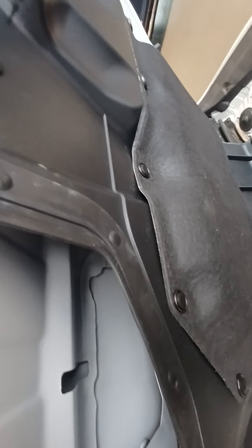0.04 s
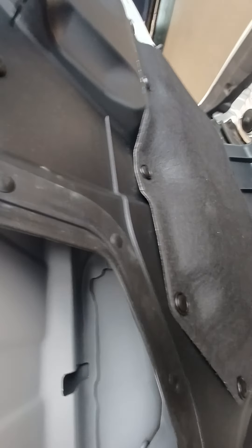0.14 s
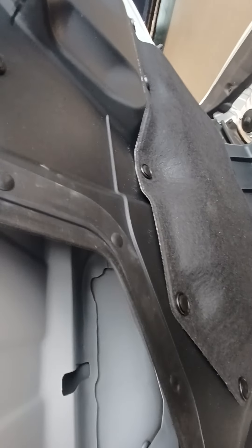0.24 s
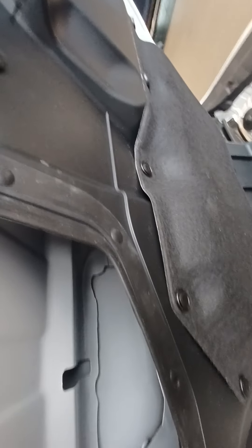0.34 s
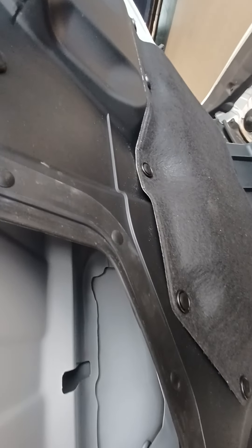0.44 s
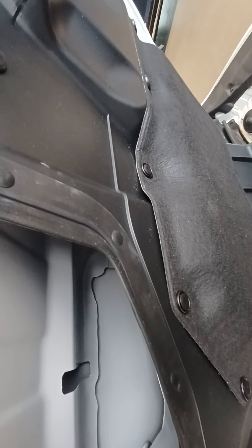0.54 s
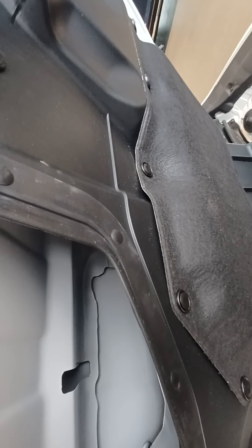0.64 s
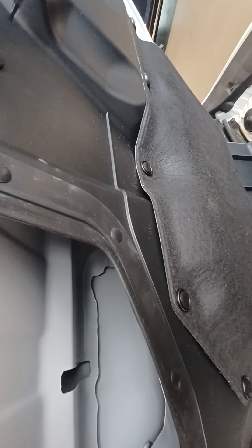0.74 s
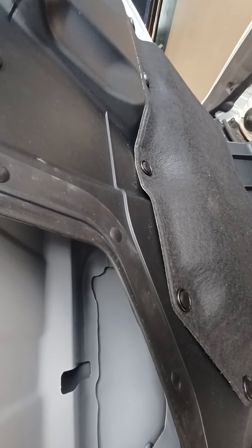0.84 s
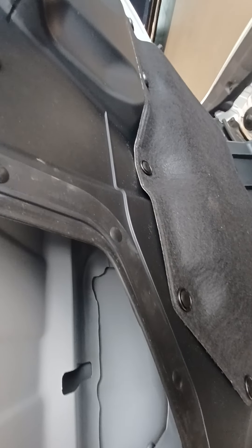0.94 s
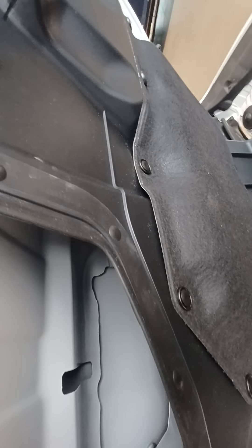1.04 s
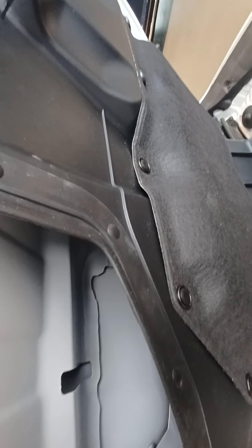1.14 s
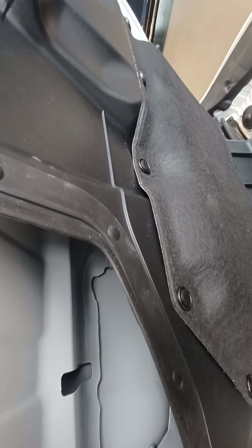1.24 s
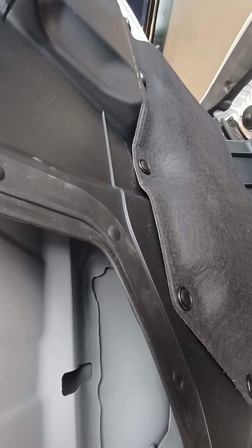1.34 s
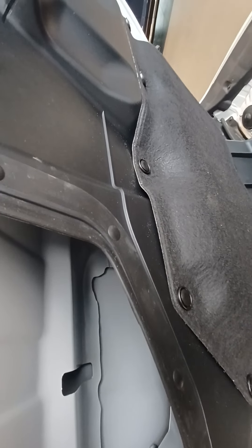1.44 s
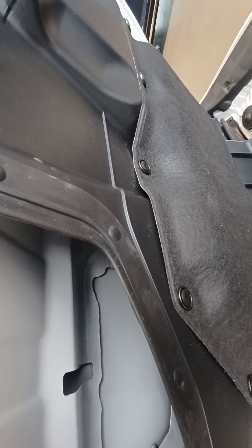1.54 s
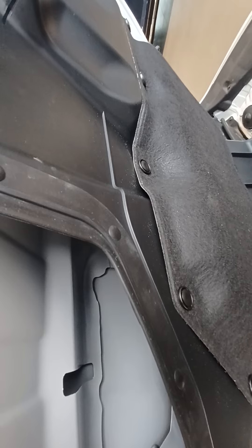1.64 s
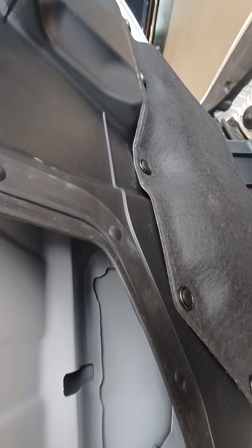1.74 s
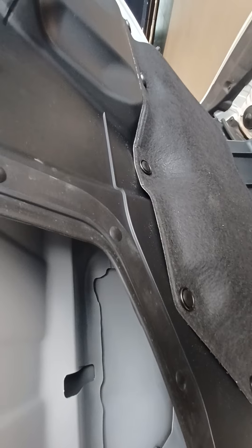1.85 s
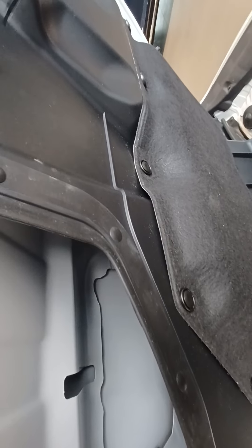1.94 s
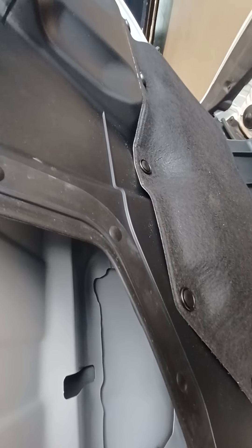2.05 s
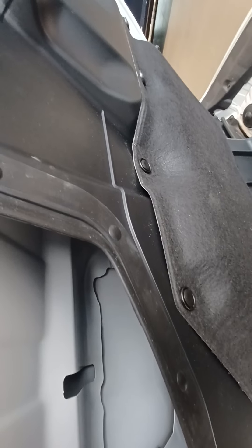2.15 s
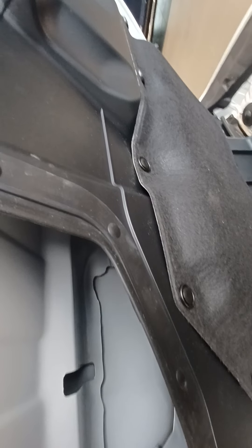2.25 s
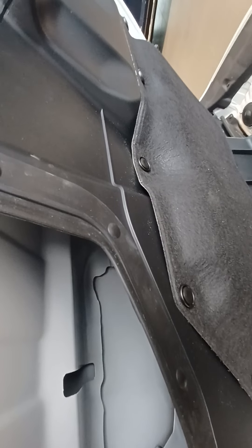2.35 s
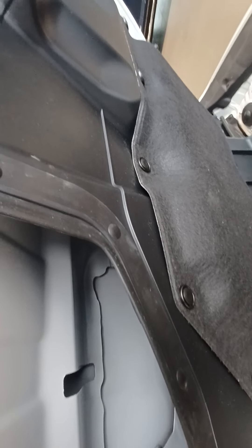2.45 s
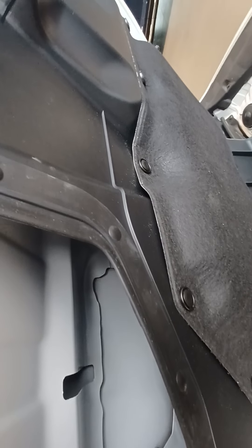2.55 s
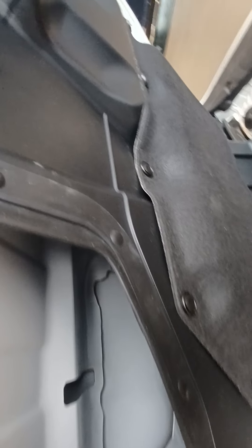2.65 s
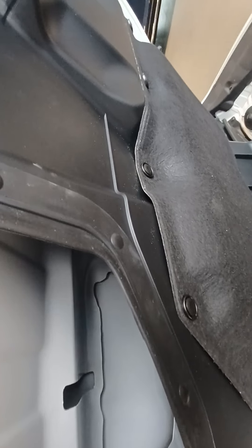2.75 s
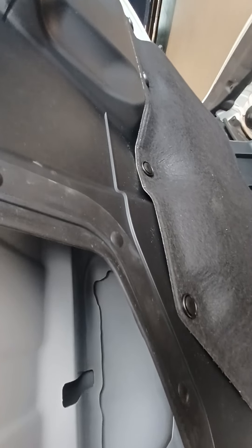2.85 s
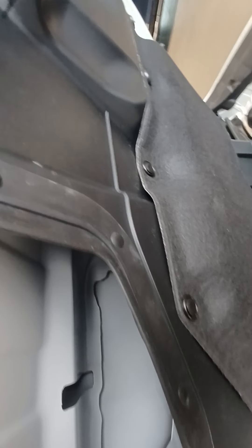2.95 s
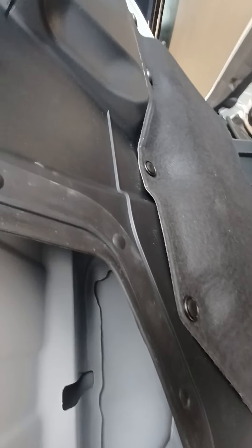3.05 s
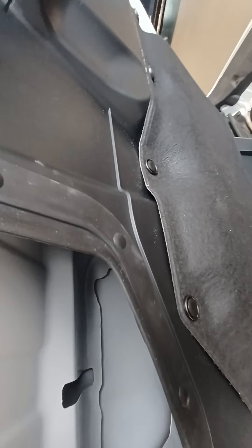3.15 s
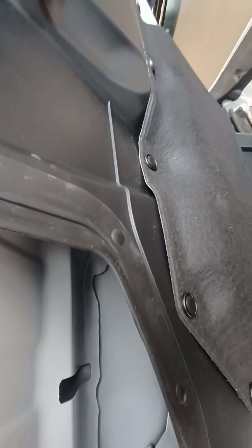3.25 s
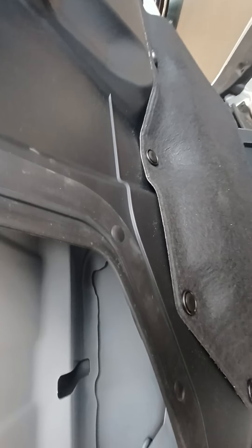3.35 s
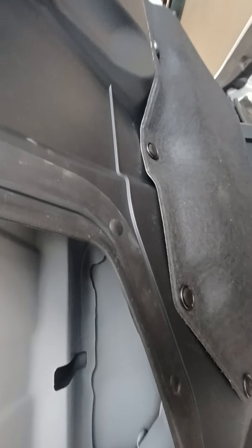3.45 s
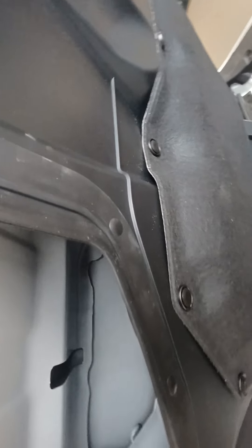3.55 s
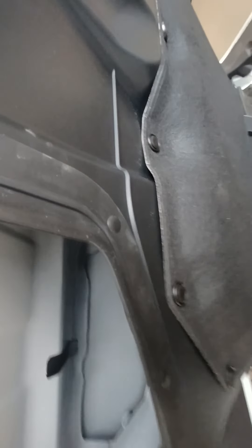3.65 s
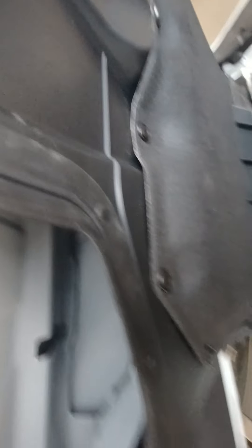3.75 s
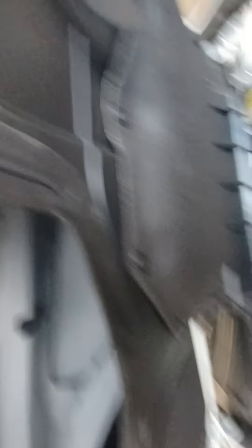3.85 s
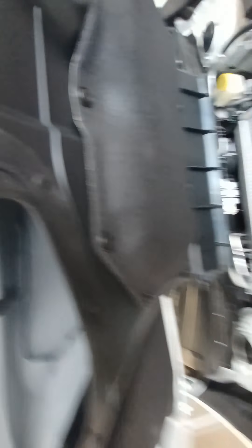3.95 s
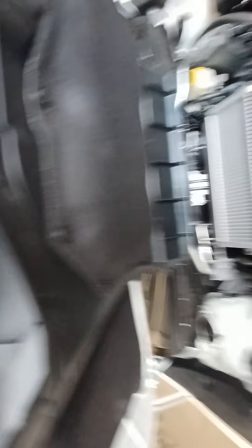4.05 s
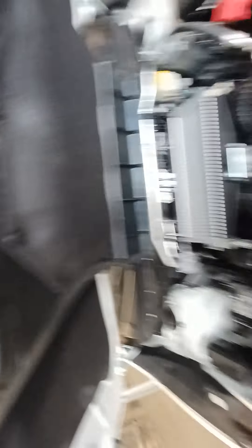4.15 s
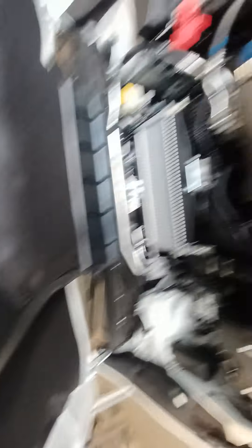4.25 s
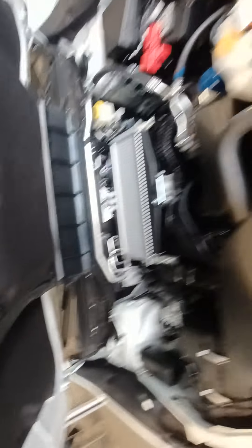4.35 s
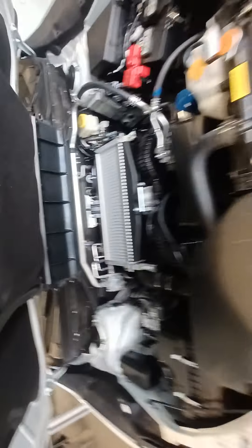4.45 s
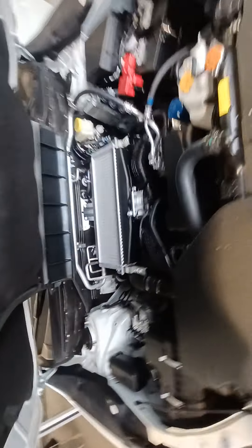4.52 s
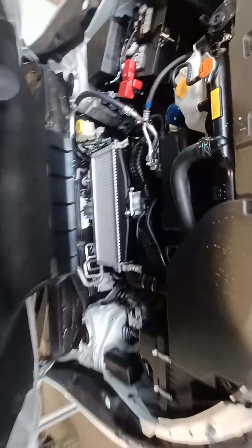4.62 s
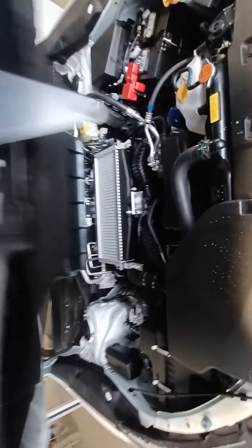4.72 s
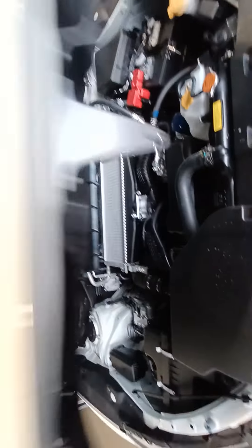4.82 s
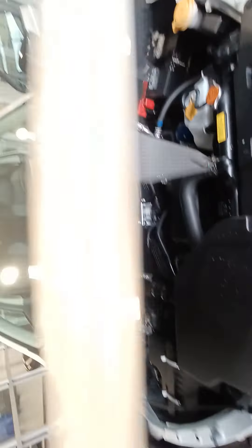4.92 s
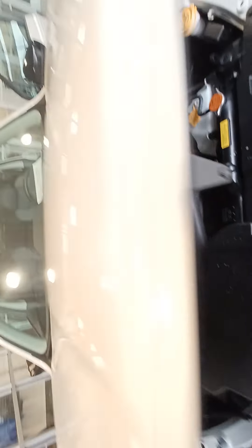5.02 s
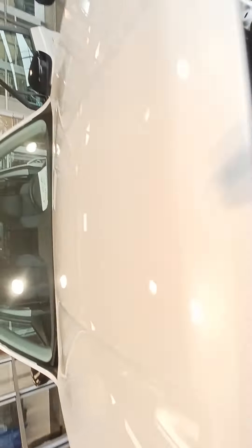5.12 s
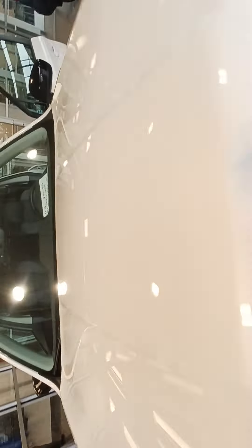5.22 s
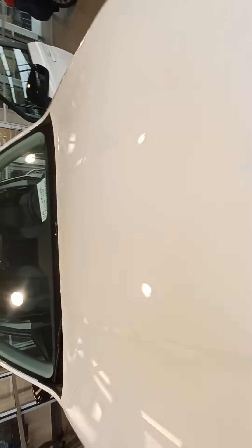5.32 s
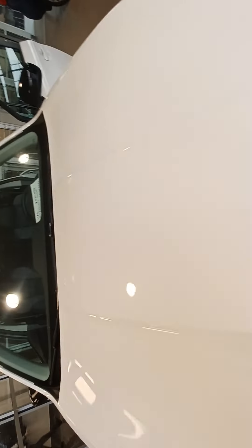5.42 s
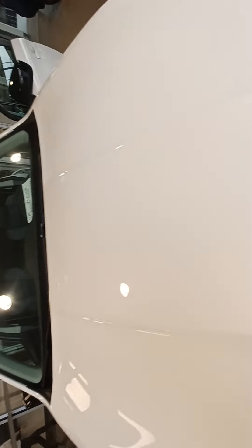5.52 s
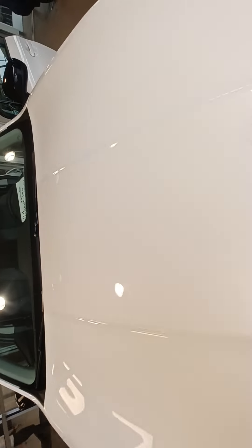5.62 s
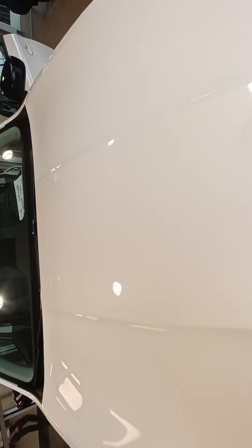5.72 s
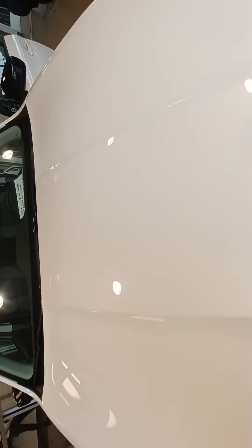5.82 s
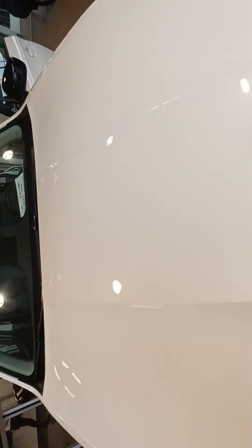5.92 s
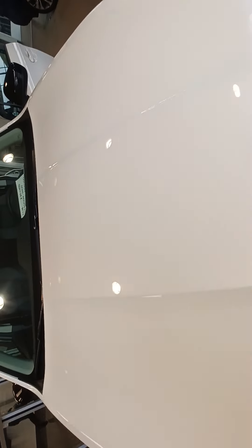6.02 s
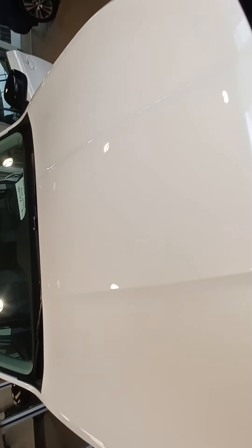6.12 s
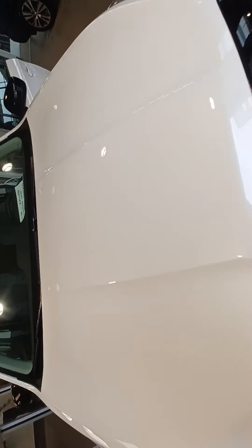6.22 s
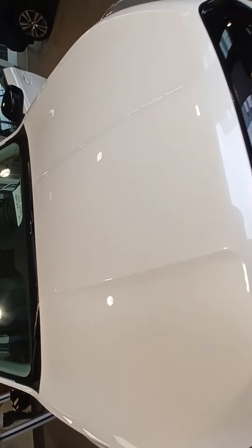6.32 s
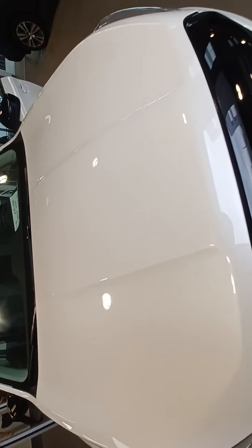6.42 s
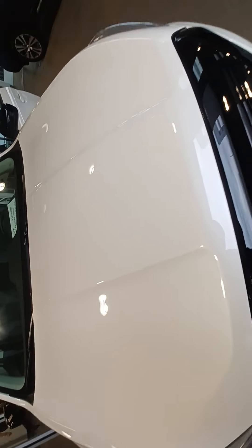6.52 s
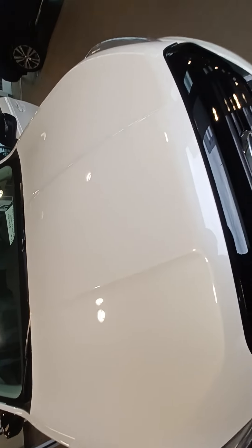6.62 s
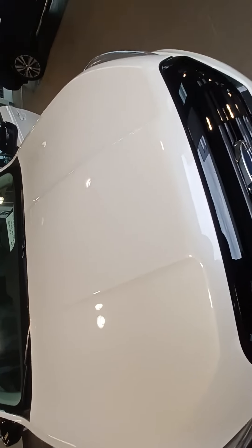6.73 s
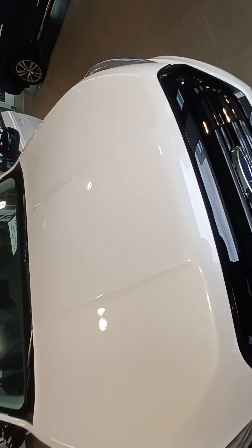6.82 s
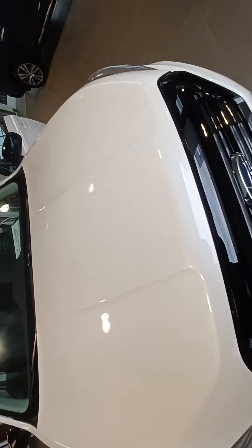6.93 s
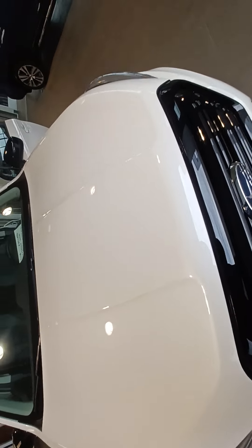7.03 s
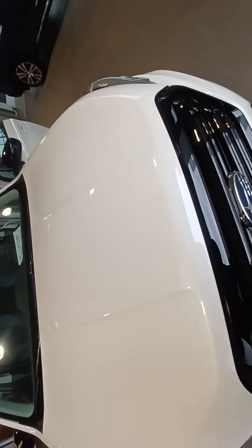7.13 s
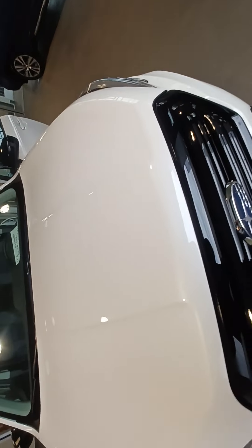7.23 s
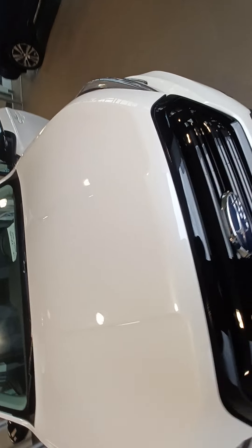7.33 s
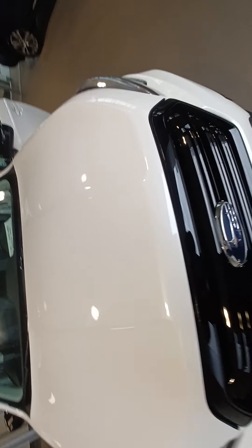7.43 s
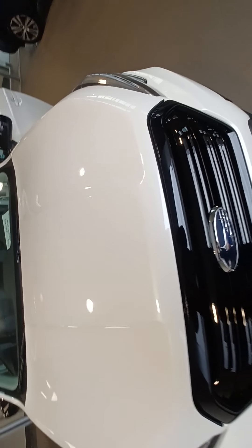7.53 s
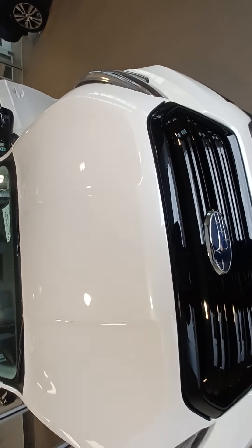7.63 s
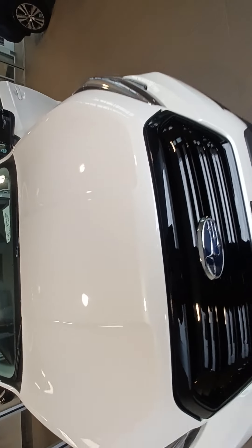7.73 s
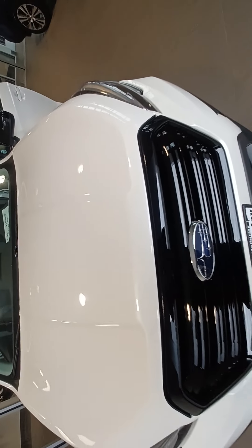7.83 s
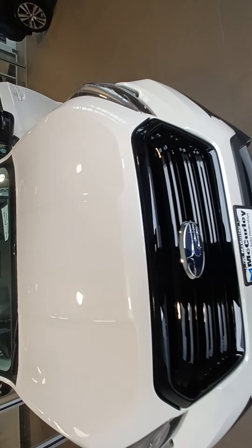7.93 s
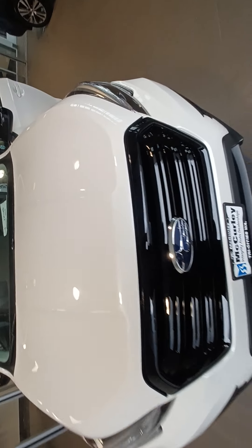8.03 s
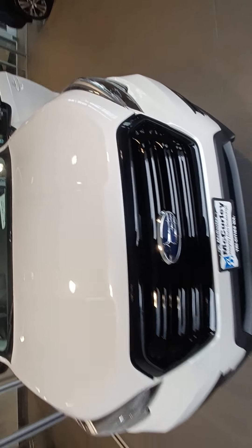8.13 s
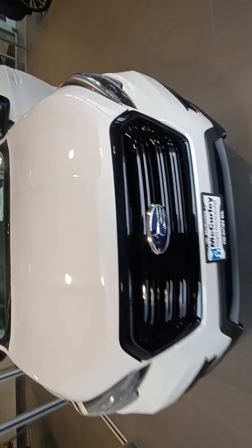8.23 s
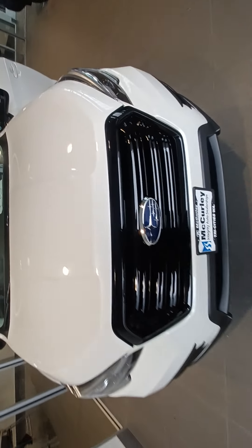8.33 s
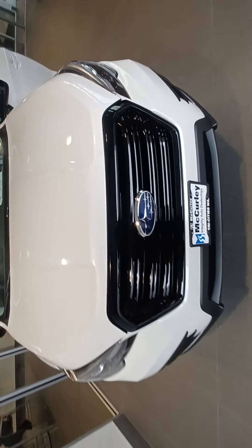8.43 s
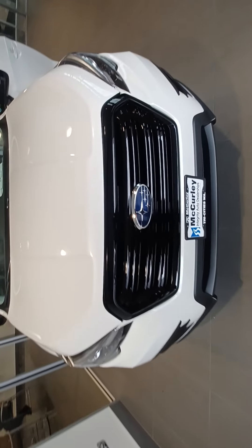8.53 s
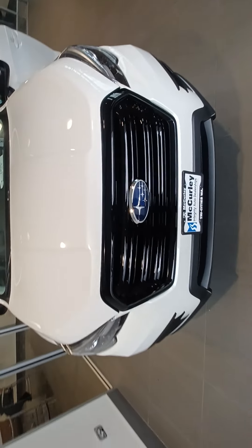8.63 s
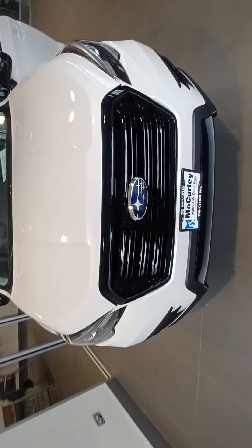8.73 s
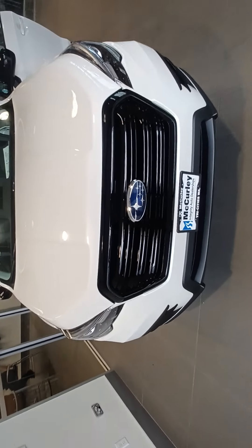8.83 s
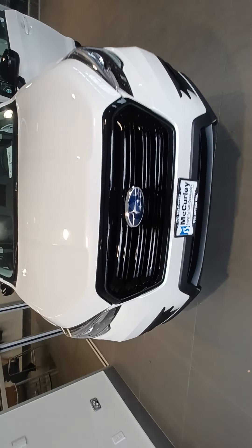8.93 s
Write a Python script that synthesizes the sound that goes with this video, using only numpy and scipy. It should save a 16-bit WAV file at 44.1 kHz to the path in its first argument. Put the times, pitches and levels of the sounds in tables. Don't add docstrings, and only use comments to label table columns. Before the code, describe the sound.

In a hard-walled showroom with a low motor hum and airy rumble, a car hood gets a dull bump, a light rod clank and a hard bouncing knock. Clothing brushes the phone, shoes scuff, a clip snaps. Then the hood slams with a boom and rattle, the hum ducks briefly, and loud crackly fabric rubbing ends it.

```python
import sys
import numpy as np
from scipy import signal
from scipy.fft import rfft, irfft, next_fast_len
from scipy.io import wavfile
from scipy.ndimage import uniform_filter1d, map_coordinates

SR = 44100
rng = np.random.default_rng(int(sys.argv[2]) if len(sys.argv) > 2 else 0)


def convert_level_to_amplitude(level_db):
    exponent = np.asarray(level_db, float) / 20
    return 10 ** exponent


def master(y):
    cut = np.clip(np.atleast_2d(y).T, -1, 1)
    pcm = np.round(cut * 32767)
    wavfile.write(sys.argv[1], SR, pcm.astype(np.int16))


N = 395577

# (frequency [Hz], level [dB per Hz])
RUMBLE = [(12, -57.5), (20, -39.5), (44, -18.5), (86, 4), (131, 5.5), (173, -2.5), (219, 1), (264, -7.5),
          (400, -29.5), (520, -52.5), (880, -120)]
# (frequency [Hz], level [dB per Hz])
AIR = [(140, -30.5), (230, -7.5), (356, -12.5), (752, -19.5), (856, -17), (1110, -22), (2480, -31),
       (2700, -37), (4020, -41.5), (5000, -39.5), (6500, -70), (11000, -120)]
# (frequency [Hz], level [dB per Hz])
HISS = [(4410, -53), (7500, -18), (8200, -18.5), (10500, -5), (11900, 1.5), (12900, 4), (14500, -4.5),
        (15800, -9.5), (16200, -21.5), (16500, -28.5)]
# (frequency [Hz], level [dB per Hz])
RUB = [(1060, -12), (1800, -0.5), (2470, -1), (4240, -1.5), (4590, -2.5), (5290, 0.5), (6560, 3.5),
       (7610, -19), (8500, -16), (11000, -30.5), (18700, -120)]
# (frequency [Hz], level [dB per Hz])
KNOCK_BODY = [(71, -55.5), (120, -26.5), (302, 4.5), (536, -19.5), (639, -6), (773, -12), (1890, -26),
              (4000, -45.5), (5200, -78.5), (8800, -120)]


def unit(x):
    return x / np.sqrt(np.mean(x ** 2) + 1e-20)


def along(points, hz):
    f, v = np.transpose(points)
    return np.interp(np.log(hz + 1), np.log(f + 1), v)


def wobble(rate_hz):
    knots = rng.standard_normal(int(N * rate_hz / SR) + 4)
    return map_coordinates(knots, [np.arange(N) * rate_hz / SR])


def sides(db):
    return convert_level_to_amplitude(np.array([db / 2, -db / 2]))


def noise(spectrum, size=N, lean=((1, 0),)):
    # (frequency [Hz], likeness [-1..1])
    alike = [(60, 1), (180, 0.91), (550, 0.4), (1650, -0.086), (4970, -0.037), (15000, 0.0029)]
    m = next_fast_len(size)
    hz = np.fft.rfftfreq(m, 1 / SR)
    turn = np.arccos(np.clip(along(alike, hz), -1, 1)) / 2
    shaped = rfft(rng.standard_normal((2, m))) * convert_level_to_amplitude(along(spectrum, hz))
    mid, side = shaped * [np.cos(turn), np.sin(turn)]
    stereo = np.array([mid + side, mid - side]) * sides(along(lean, hz))
    return unit(irfft(stereo, m)[:, :size])


def add(track, s, sound):
    part = track[:, round(s * SR):][:, :sound.shape[1]]
    part += sound[:, :part.shape[1]]


def swells(peak_s, db, rise_s, fall_s):
    hop = 96
    late_s = np.arange(0, N + hop, hop)[:, None] / SR - peak_s
    drop = np.where(late_s < 0, -late_s / np.abs(rise_s), late_s / np.abs(fall_s))
    power = convert_level_to_amplitude(2 * (db - 20 * drop)).sum(1)
    return np.interp(np.arange(N), np.arange(len(power)) * hop, 10 * np.log10(power + 1e-14))


def walk_m():
    # (time [s], distance [m])
    path = [
        (0, 0.16),
        (1.2, 0.053),
        (3.2, 0.0073),
        (3.7, 0.5),
        (4.75, 0.75),
        (6.5, 0.83),
        (7.0, 1.63),
        (7.7, 1.82),
        (8.4, 2.38),
        (8.97, 2.46),
    ]
    return np.interp(np.arange(N) / SR, *np.transpose(path))


def ducking():
    start_s, depth_db = 5.42, -10
    in_s, hold_s, out_s = 0.43, 0.73, 0.68
    corners_s = start_s + np.cumsum([0, in_s, hold_s, out_s])
    return depth_db * np.interp(np.arange(N) / SR, corners_s, [0, 1, 1, 0])


def ventilation():
    # (mean level [dB], swing [dB], phase at walk start [rad])
    orders = [
        (-44, 3, 3.36),
        (-47, 6, 2.75),
        (-46, 5, 1.98),
    ]
    # (frequency [Hz], left-right difference [dB])
    tilt = [(60, 0), (240, -1), (950, -2), (3770, -4.5), (15000, -17)]
    motor_hz, sound_m_per_s = 73.02, 343
    metres = walk_m()
    turn = 2 * np.pi * motor_hz * np.arange(N) / SR
    wave = 2 * np.pi * motor_hz * metres / sound_m_per_s
    hum = np.zeros(N)
    for k, (db, swing_db, phase) in enumerate(orders, 1):
        level_db = db + 4.0 + swing_db * np.cos(k * wave + phase) + 3.17 * wobble(4)
        hum += convert_level_to_amplitude(level_db) * np.sin(k * turn + 0.94 * wobble(2.73))
    shelter_db, shelter_m = -2.5, 0.14
    rumble_db = -39.5 + shelter_db * np.exp(-(metres / shelter_m) ** 2) + 0.31 * wobble(9.4)
    air_db = -48.95 + 1.45 * metres + 0.27 * wobble(3.3)
    rumble = convert_level_to_amplitude(rumble_db) * noise(RUMBLE, lean=tilt)
    air = convert_level_to_amplitude(air_db) * noise(AIR, lean=tilt)
    return convert_level_to_amplitude(ducking()) * (hum * sides(-1.5)[:, None] + rumble + air)


def patchy(x, depth_db):
    z = signal.stft(x, nperseg=256)[2]
    field = uniform_filter1d(rng.standard_normal(z.shape[1:]), size=4, axis=0)
    field = uniform_filter1d(field, size=14, axis=1)
    return unit(signal.istft(z * convert_level_to_amplitude(depth_db * unit(field)), nperseg=256)[1][:, :N])


def rubbing():
    # (peak time [s], hiss [dB], rub [dB], rise over 20 dB [s], fall over 20 dB [s])
    strokes = [(.78, -58.5, -63, 1.3, 0.75), (1.5, -64, -62.5, 1.3, 0.49), (2.44, -63, -67.5, 0.23, 1.3),
               (2.789, -48, -51.5, 0.19, 0.27), (3.232, -44.5, -55.5, 0.053, 0.088),
               (3.334, -64, -61, .09, 0.12), (3.71, -62, -64, 1.2, .4), (3.84, -55.5, -59, .12, 0.92),
               (4.165, -61, -59.5, 0.044, .4), (4.46, -61, -63.5, 4.5, .9), (4.76, -56.5, -61, 1.1, 0.94),
               (5.38, -60.5, -63.5, 1.1, 0.62), (5.93, -55.5, -63.5, 0.17, 0.52),
               (6.145, -54, -56.5, 0.086, 0.14), (6.4, -66.5, -83, 0.2, 1.2), (7.05, -59, -58, 0.21, 0.4),
               (7.262, -51.5, -57.5, 0.0089, 0.5), (7.72, -62, -59.5, 1.5, 1),
               (7.53, -41.5, -50.5, 0.075, 0.15), (7.614, -44.5, -41.5, 0.1, 0.14),
               (8.01, -54.5, -53.5, 0.016, 1.2), (8.19, -39, -46, 0.017, 0.28),
               (8.31, -37, -41.5, 0.074, 0.17), (8.42, -69, -60, 0.12, 0.27),
               (8.97, -56.5, -57.5, 0.42, .4)]
    still_hiss_db, still_rub_db = -75, -74.5
    peak_s, hiss, rub, rise_s, fall_s = np.transpose(strokes)
    hiss_db = np.maximum(swells(peak_s, hiss, rise_s, fall_s), still_hiss_db)
    rub_db = np.maximum(swells(peak_s, rub, rise_s, fall_s), still_rub_db)
    busy = np.clip((hiss_db + 51) / 14, .25, 1.3)
    grain = convert_level_to_amplitude(busy * (1.7 * wobble(400) + 1.1 * wobble(45)) + 1.1 * wobble(6.3))
    fabric = convert_level_to_amplitude(hiss_db + 1.5) * noise(HISS)
    fabric += convert_level_to_amplitude(rub_db + 0.5) * patchy(noise(RUB), depth_db=2.1)
    pan_db = -6 + 2 * walk_m()
    return sides(pan_db) * grain * fabric


def creases():
    # (time [s], peak level [dB], rub band [dB], left-right difference [dB])
    snaps = [(0.2934, -43, -51, -3), (0.3007, -32, -36, -12), (1.6791, -56, -36, -7),
             (2.5785, -64, -38.5, 7), (2.8135, -34, -27.5, -4), (3.8104, -47, -46, -8),
             (3.8297, -33, -39, -12), (6.098, -55, -41, 0), (6.121, -42, -54, -2), (6.1298, -42, -35, 4),
             (6.144, -31, -56, 6), (6.4775, -37, -50, 5), (7.1514, -62, -43.5, -1), (7.2587, -33, -50, 0.5),
             (7.299, -37, -58, 1), (7.329, -42, -60, 1.5), (7.337, -55, -37, 2), (7.3545, -28.5, -65, 3),
             (7.3981, -31, -41, -4), (7.4165, -31, -58, -1), (7.4503, -42, -55, 3), (7.4729, -34, -39.5, 8),
             (7.4979, -27.5, -38, 7), (7.5198, -22, -53, 5.5), (7.5752, -21, -53, 13),
             (7.6036, -18, -39, 8), (8.186, -25, -55, 0), (8.2035, -16, -48, -2), (8.208, -26, -55, -3),
             (8.2185, -20, -52, -6), (8.242, -25, -55, -3), (8.2505, -16.5, -46, -7),
             (8.3105, -21, -40, -7), (8.313, -22, -45, -6), (8.3245, -20, -50, -8), (8.337, -23, -52, -4),
             (8.3445, -16, -48, 0), (8.8385, -34, -46, 0), (8.952, -35, -46, 8), (8.9421, -41, -44, 10)]
    # (time [s], peak level [dB], rub band [dB], left-right difference [dB])
    swishes = [
        (1.8192, -31.5, -37.5, -5),
        (4.7686, -36, -73, -11.5),
        (6.1298, -29, -37, -2.5),
        (7.2589, -29, -59, 3),
        (7.6153, -18.5, -33, 8.5),
        (8.006, -52, -46.5, -11),
        (8.18, -21, -54, -6),
        (8.309, -27, -44, -3),
        (8.8378, -33, -43, -3),
    ]
    out, t = np.zeros((2, N)), np.arange(SR // 8) / SR
    dry_shape = convert_level_to_amplitude(6.5 - 60 * t / 0.0043) + convert_level_to_amplitude(-3.5 - 60 * t / 0.025)
    lingering_shape = convert_level_to_amplitude(-60 * t / 0.004) + convert_level_to_amplitude(-3.0 - 60 * t / 0.1)
    for events, shape in ((snaps, dry_shape), (swishes, lingering_shape)):
        for s, db, rub_db, pan_db in events:
            snap = convert_level_to_amplitude(db - 12) * noise(HISS, size=len(t))
            snap += convert_level_to_amplitude(rub_db - 12.5) * noise(RUB, size=len(t))
            add(out, s, snap * shape * sides(pan_db)[:, None])
    return out


def scuffs():
    # (peak time [s], level [dB], fall over 20 dB [s])
    events = [
        (3.17, -52, -0.5),
        (3.65, -54, -1.5),
        (4.128, -40.5, .06),
        (4.165, -29.5, 0.2),
        (4.228, -35, 0.06),
        (4.3, -36, 0.13),
        (4.365, -42.5, 0.3),
        (4.41, -43, .2),
        (7.579, -38, .16),
        (8.33, -49, -1),
    ]
    # (frequency [Hz], level [dB per Hz])
    body = [(88, -28), (150, -4), (294, -1.5), (403, -18.5), (478, -14), (539, -17), (3500, -44.5),
            (4550, -71), (7700, -120)]
    rise_s = 0.048
    peak_s, db, fall_s = np.transpose(events)
    return convert_level_to_amplitude(swells(peak_s, db, rise_s, fall_s) + 2.3 * wobble(60)) * noise(body)


def taps():
    # (time [s], peak level [dB], frequency [Hz], t60 [s])
    events = [(.002, -44, 1206, 0.52), (0.121, -55, 2400, 0.23), (0.929, -54, 1210, 0.49),
              (1.177, -32, 1430, 0.013), (2.579, -34, 1900, 0.005), (2.813, -28, 900, 0.0041),
              (2.815, -41, 450, .012), (3.81, -45, 3760, .02), (3.835, -43, 2800, 0.026),
              (3.925, -54, 3300, .5), (3.919, -27, 525, 0.055), (4.506, -19.5, 1180, 0.0037),
              (6.098, -51, 2400, 0.013), (6.13, -44, 2750, .02), (7.577, -25.5, 495, 0.012),
              (7.709, -36, 4800, 0.0034), (7.717, -32.5, 4340, .006), (7.727, -37, 4650, 0.0049),
              (8.056, -38.5, 2370, 0.036), (8.125, -46, 4200, 0.075), (8.182, -36.5, 1870, 0.012),
              (8.226, -42, 4440, 0.11), (8.312, -39, 2110, 0.022), (8.326, -31, 2400, 0.014),
              (8.345, -36, 2020, 0.021), (8.943, -34, 2240, 0.0083), (8.951, -41, 1980, 0.05)]
    out, t = np.zeros((2, N)), np.arange(SR // 5) / SR
    for s, db, hz, t60_s in events:
        steps = uniform_filter1d(rng.standard_normal((2, len(t))), size=12)
        drift_rad = 0.16 * hz / 2500 * np.cumsum(steps, axis=1)
        envelope = convert_level_to_amplitude(db + 5.5 - 60 * t / t60_s) * (1 - np.exp(-t / t60_s / 0.071))
        add(out, s, envelope * np.sin(2 * np.pi * hz * t + drift_rad) * sides(-2.9)[:, None])
    return out


def hall(x):
    # (frequency [Hz], t60 [s])
    decay = [(60, 0.45), (250, 0.47), (1000, 0.69), (3000, 0.82), (6000, 0.5), (12000, 0.4)]
    flat = [(20, 0.0073), (20000, 0.011)]
    hz, t, z = signal.stft(noise(flat, size=SR), SR, nperseg=256)
    tail = signal.istft(z * convert_level_to_amplitude(-60 * t / along(decay, hz)[:, None]), SR, nperseg=256)[1]
    tail *= 1 - np.exp(-np.arange(tail.shape[1]) / SR / 0.011)
    return signal.fftconvolve(x.mean(0)[None], tail / np.linalg.norm(tail[0]), axes=1)


def pulse(spectrum, like):
    click = np.roll(irfft(convert_level_to_amplitude(along(spectrum, np.fft.rfftfreq(512, 1 / SR)))), 256)
    return click[None] * np.linalg.norm(like[0]) / np.linalg.norm(click)


def unsteady(t):
    return 2.1e-6 * np.cumsum(uniform_filter1d(rng.standard_normal(len(t)), size=40))


def ringing(modes, t):
    ports_s, scatter_db = 0.00042, 1.5
    shaky_t = t + unsteady(t)
    ring = np.zeros((2, len(t)))
    for hz, db, t60_s in modes:
        envelope = convert_level_to_amplitude(db + rng.normal(0, scatter_db) - 60 * t / np.clip(t60_s, .03, .4))
        lag_s = ports_s / 2 * rng.uniform(.5, 1) * np.array([[1], [-1]])
        ring += envelope * np.sin(2 * np.pi * hz * (shaky_t + lag_s))
    return ring


def blow(contacts, modes, body, clank_t60, body_t60, rattle_db, wet_db, pan_db):
    # (frequency [Hz], level [dB per Hz])
    clank_spectrum = [(880, -16), (1500, 0.5), (1600, -2), (1880, -4.5), (3050, -12), (5430, -4), (6040, 2),
                      (7420, -17), (8200, -23.5), (10700, -48.5), (18000, -120)]
    # (frequency [Hz], level [dB per Hz])
    sheen_spectrum = [(4470, -52.5), (7600, -59), (8810, -9), (11500, 2.5), (13100, 6.5), (14400, -4.5),
                      (15400, -10), (16000, -19), (16700, -58)]
    t, first_s = np.arange(SR // 3) / SR, contacts[0][0]
    near, far, out = np.zeros((2, SR)), np.zeros((2, SR)), np.zeros((2, N))
    for s, clank_db, sheen_db, panel_db, swell_s in contacts:
        rattle = convert_level_to_amplitude(rattle_db - 60 * t / body_t60) * noise(body, size=len(t))
        panel = convert_level_to_amplitude(panel_db) * (1 - np.exp(-t / swell_s)) * (ringing(modes, t) + rattle)
        clank = convert_level_to_amplitude(clank_db - 60 * t / clank_t60) * noise(clank_spectrum, size=len(t))
        sheen = convert_level_to_amplitude(sheen_db - 60 * t / clank_t60) * noise(sheen_spectrum, size=len(t))
        add(near, s - first_s, panel + clank + sheen)
        add(far, s - first_s, panel)
        add(far, s - first_s, pulse(clank_spectrum, clank) + pulse(sheen_spectrum, sheen))
    add(out, first_s, near * sides(pan_db)[:, None])
    add(out, first_s, convert_level_to_amplitude(wet_db) * hall(far))
    return out


def bump():
    # (time [s], clank [dB], sheen [dB], panel [dB], swell [s])
    bump_contacts = [
        (.1765, -26, -23, -10.5, 0.0013),
    ]
    sway_contacts = [
        (.184, -20.5, -30, -9.5, 0.0054),
        (.194, -28, -28.5, -13, 0.0066),
    ]
    # (frequency [Hz], level [dB], t60 [s])
    bump_modes = [(86.8, -4.5, 0.34), (160, -1, 0.061), (322, 6, 0.025), (410, -6, 0.027),
                  (543, -8.5, 0.091), (1840, -28, .07), (2299, -29, .06)]
    sway_modes = [(76, -12, 0.31), (86.2, -1.5, 0.2), (162, -2.5, 0.18), (250, -11, 0.12),
                  (386, -12, 0.054), (548, -11, 0.1), (720, -7, 0.09), (900, -14, 0.1), (2299, -31, 0.062),
                  (3400, -20, 0.086), (4200, -6, 0.044), (5300, -16, 0.034)]
    # (frequency [Hz], level [dB per Hz])
    body = [(120, -27), (200, 4.5), (716, -7), (789, -9), (1940, -26.5), (2230, -17.5), (5500, -32),
            (7150, -55), (12100, -120)]
    out = blow(bump_contacts, bump_modes, body, clank_t60=0.054, body_t60=0.17,
               rattle_db=-12.5, wet_db=-19.0, pan_db=-8.5)
    return out + blow(sway_contacts, sway_modes, body, clank_t60=0.052, body_t60=0.2,
                      rattle_db=-11.0, wet_db=-19.5, pan_db=-5.5)


def prop_rod():
    # (time [s], clank [dB], sheen [dB], panel [dB], swell [s])
    contacts = [
        (1.726, -32.5, -38, -34.5, 0.0023),
        (1.736, -43, -53.5, -17, .007),
    ]
    # (frequency [Hz], level [dB], t60 [s])
    modes = [(201, -4.5, 0.2), (250, 5, .1), (322, 1.5, 0.11), (369, -2.5, 0.053), (640, -15, 0.11),
             (1186, -21, .08), (1927, -25.5, .1), (2272, -15.5, 0.11), (2627, -30, .12), (2800, -27.5, .1),
             (3370, -19, 0.09), (3591, -28, .09)]
    return blow(contacts, modes, KNOCK_BODY, clank_t60=0.071, body_t60=.12,
                rattle_db=-12.0, wet_db=-11.0, pan_db=-3.0)


def panel_knock():
    # (time [s], clank [dB], sheen [dB], panel [dB], swell [s])
    contacts = [
        (2.108, -12.5, -22.5, -17.5, 0.0018),
        (2.115, -29, -36.5, -14, .002),
        (2.126, -39.5, -43.5, -17, 0.0011),
        (2.136, -40, -48.5, -18.5, 0.0034),
        (2.161, -51, -56.5, -21, 0.0057),
    ]
    # (frequency [Hz], level [dB], t60 [s])
    modes = [(216, -15, 0.2), (256, 1.5, 0.24), (268.2, -7, .4), (306.4, -2.5, 0.31), (359, -10, 0.24),
             (628, -2.5, 0.09), (927, -0.5, 0.1), (1000, -3.5, .06), (1367, -11, .05), (1728, -23.5, .15),
             (1910, -6, 0.1), (2400, -11, 0.057), (2960, -27.5, .08), (3600, -17.5, 0.077)]
    return blow(contacts, modes, KNOCK_BODY, clank_t60=0.079, body_t60=0.15,
                rattle_db=1.2, wet_db=-15, pan_db=-3.5)


def rod_clip():
    # (time [s], clank [dB], sheen [dB], panel [dB], swell [s])
    contacts = [
        (3.885, -34, -28, -25, 0.00024),
        (3.897, -55, -54.5, -20.5, 0.017),
    ]
    # (frequency [Hz], level [dB], t60 [s])
    modes = [(281, -4.5, 0.28), (379, 4.5, 0.043), (523, 2, 0.023), (598, -2, 0.06), (1430, -26, 0.04),
             (2380, -30, 0.04), (3300, -26, 0.04)]
    # (frequency [Hz], level [dB per Hz])
    body = [(110, -41), (180, -3), (262, -7), (602, -7.5), (935, -15), (2320, -22), (4000, -33),
            (5200, -68), (8800, -120)]
    return blow(contacts, modes, body, clank_t60=0.035, body_t60=0.062,
                rattle_db=4.5, wet_db=-14.5, pan_db=-0.5)


def latch_and_slam():
    # (time [s], clank [dB], sheen [dB], panel [dB], swell [s])
    latch_contacts = [
        (5.4035, -45, -47.5, -49, .001),
        (5.4064, -15, -9, -13.5, 0.0031),
        (5.418, -16, -13.5, -14, 0.0036),
    ]
    slam_contacts = [
        (5.431, -26.5, -22.5, -11.5, 0.0027),
        (5.444, -33, -34, -18.5, .003),
        (5.455, -25, -41, -17.5, 0.0045),
        (5.468, -40, -45, -17.5, 0.0059),
        (5.49, -47.5, -55, -24, 0.0069),
        (5.53, -50, -58, -31, 0.015),
        (5.565, -53, -61, -34, 0.012),
        (5.64, -60, -66, -48, 0.011),
    ]
    # (frequency [Hz], level [dB], t60 [s])
    latch_modes = [(80, -9, 0.092), (127, 2.5, 0.1), (140, -5, .12), (450, -9, 0.092), (930, -8.5, 0.089),
                   (1185, -19.5, 0.037), (1420, -19, .04)]
    slam_modes = [(77.5, -7, 0.17), (119.4, 4, 0.13), (149, -1, 0.1), (261, -4.5, 0.17), (286.4, -2, 0.11),
                  (325.3, -5.5, 0.15), (448.4, -7.5, 0.13), (522, -8.5, 0.23), (563, -6.5, 0.13),
                  (709, -12, 0.11), (880, -23, 0.21), (929, -14.5, 0.14), (1267, -10, 0.12),
                  (1470, -18, 0.11)]
    # (frequency [Hz], level [dB per Hz])
    body = [(15, -58), (25, -22.5), (102, -9.5), (205, -13.5), (270, -10), (555, -16), (604, -26.5),
            (701, -17), (1860, -29.5), (4000, -29.5), (5200, -35.5), (8800, -120)]
    out = blow(latch_contacts, latch_modes, body, clank_t60=0.056, body_t60=0.1,
               rattle_db=-3.0, wet_db=-3.0, pan_db=-2.0)
    return out + blow(slam_contacts, slam_modes, body, clank_t60=0.08, body_t60=0.23,
                      rattle_db=-2.5, wet_db=-6.0, pan_db=1.0)


def hood():
    blows = bump() + prop_rod() + panel_knock() + rod_clip() + latch_and_slam()
    deep_hz = 54
    return signal.sosfilt(signal.butter(3, deep_hz, "high", fs=SR, output="sos"), blows)


def slam_echo():
    # (peak time [s], level [dB], rise over 20 dB [s], fall over 20 dB [s])
    bands = [
        (5.58, -28, 0.41, 0.26),
        (5.57, -35, 0.26, 0.09),
        (5.57, -36, 0.088, 0.144),
    ]
    out = np.zeros((2, N))
    for row, spectrum in zip(bands, (RUMBLE, AIR, RUB)):
        out += convert_level_to_amplitude(swells(*np.transpose([row]))) * noise(spectrum)
    return out


def scene():
    return ventilation() + rubbing() + creases() + scuffs() + taps() + hood() + slam_echo()


def low_pass(x):
    return signal.sosfilt(signal.butter(12, 16810, fs=SR, output="sos"), x)


def record(dry):
    clipped = dry / (1 + np.abs(dry / .9) ** 6) ** (1 / 6)
    limited = signal.sosfilt(signal.ellip(8, .2, 70, 15750, fs=SR, output="sos"), clipped)
    return low_pass(limited)


dry = scene()
out = record(dry)
master(out)
```